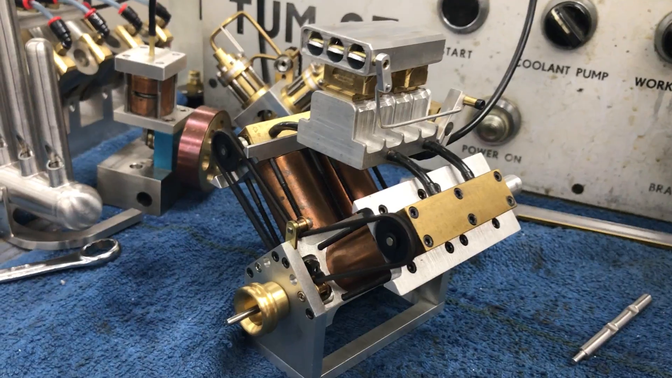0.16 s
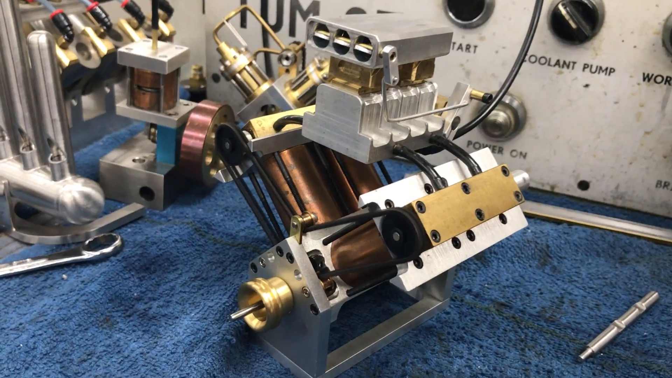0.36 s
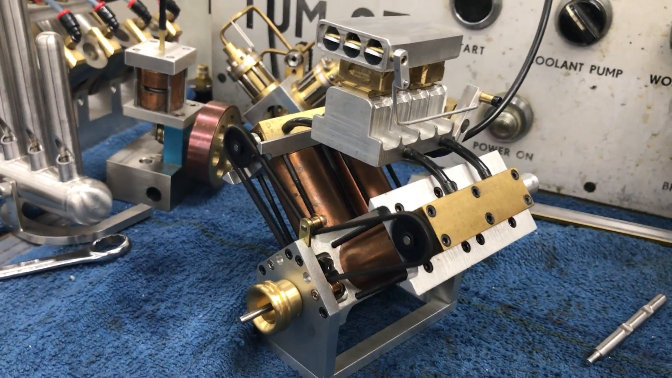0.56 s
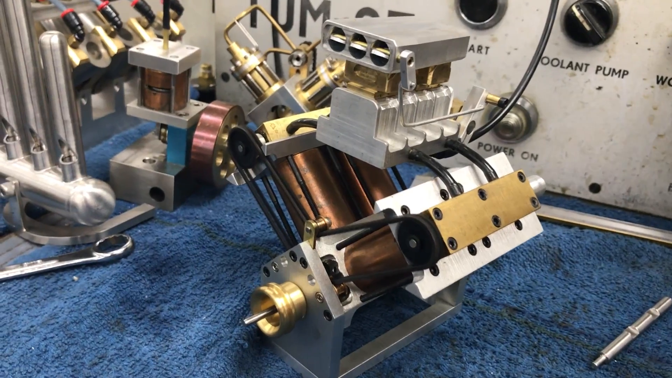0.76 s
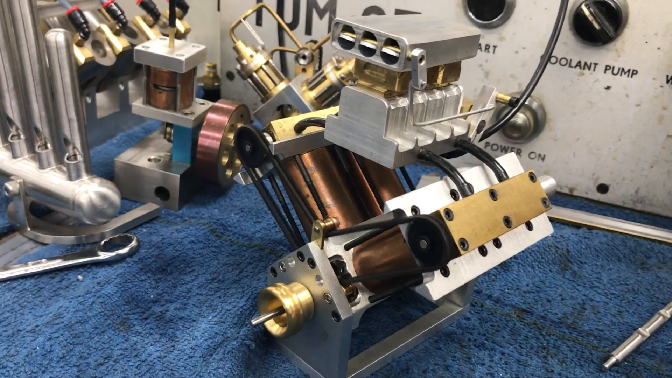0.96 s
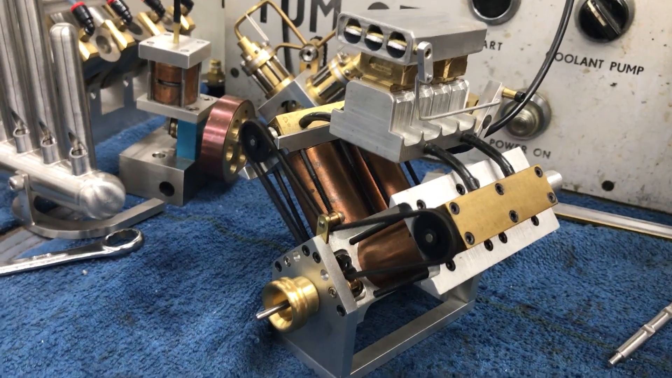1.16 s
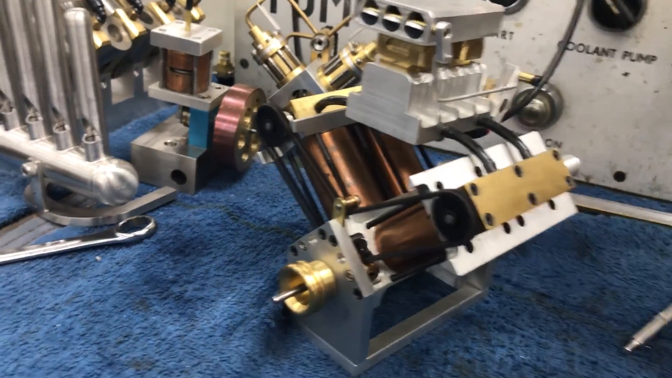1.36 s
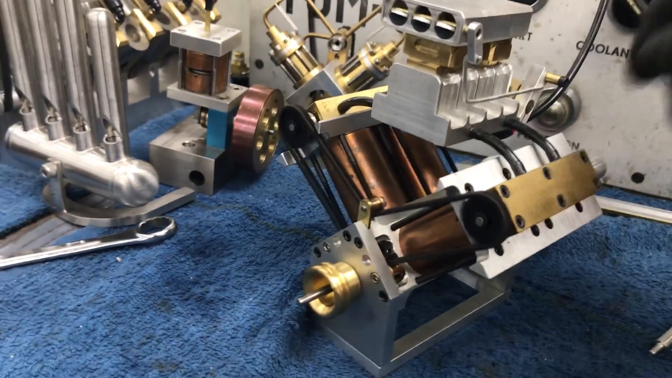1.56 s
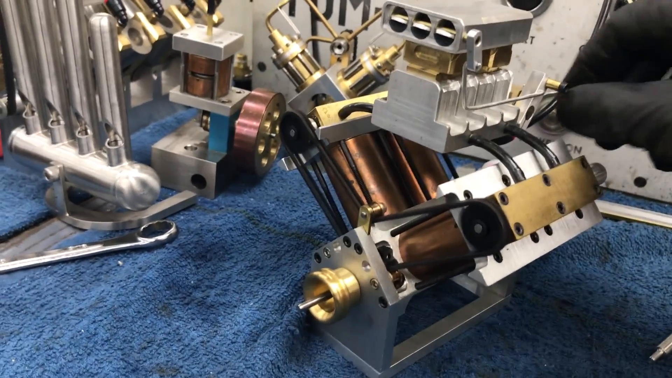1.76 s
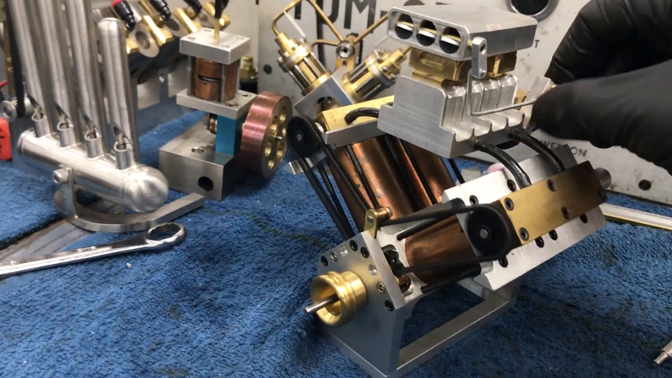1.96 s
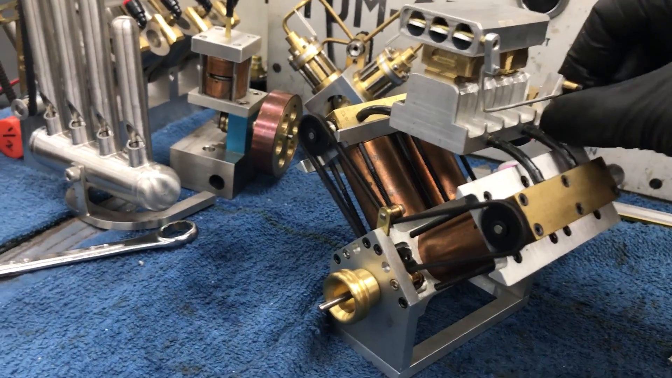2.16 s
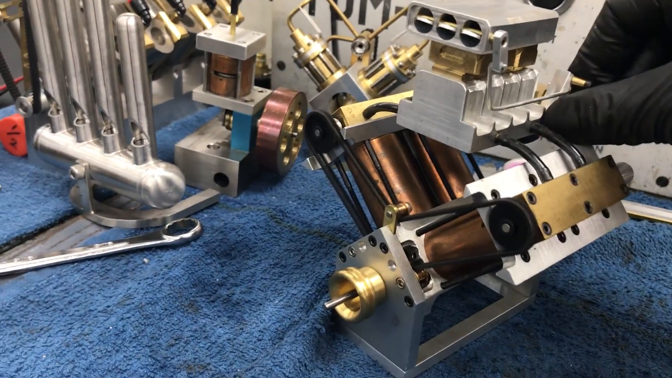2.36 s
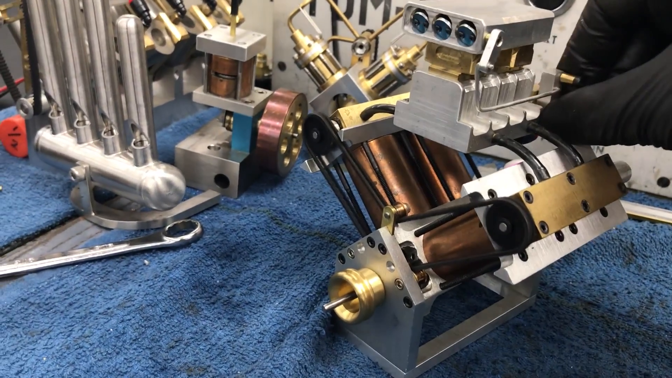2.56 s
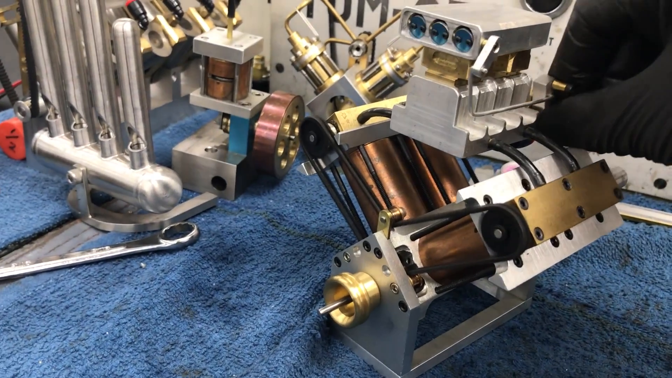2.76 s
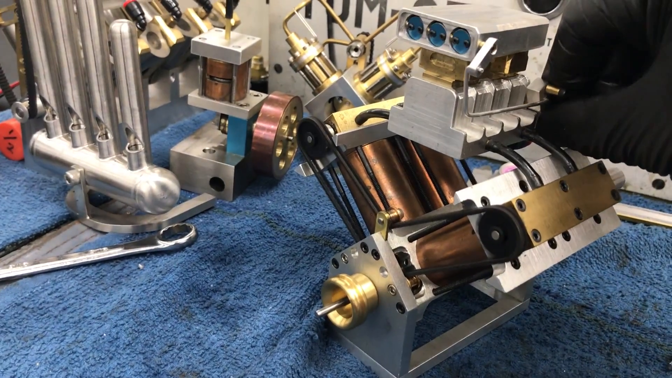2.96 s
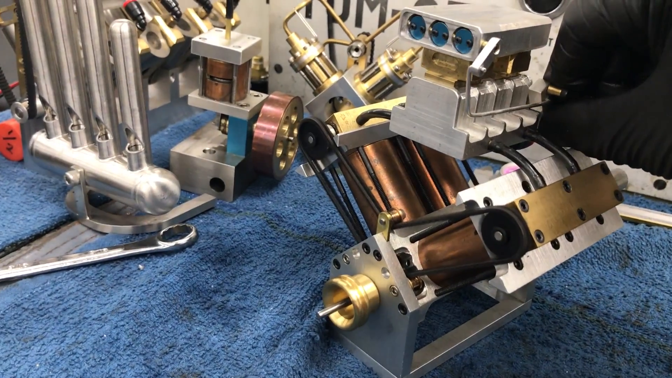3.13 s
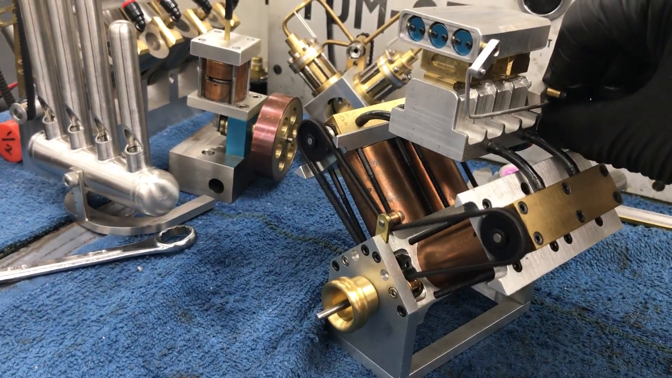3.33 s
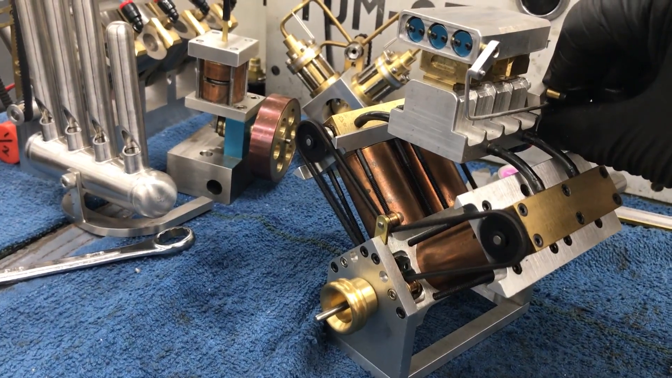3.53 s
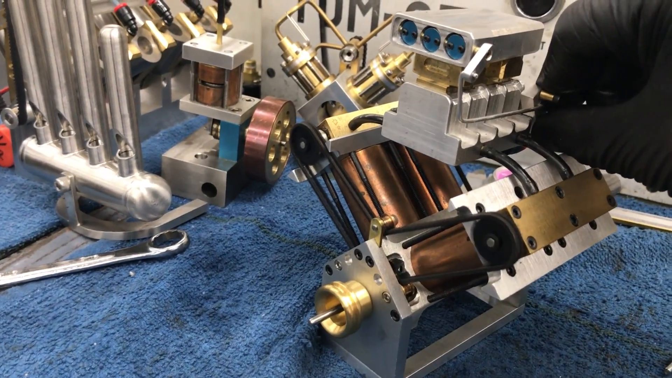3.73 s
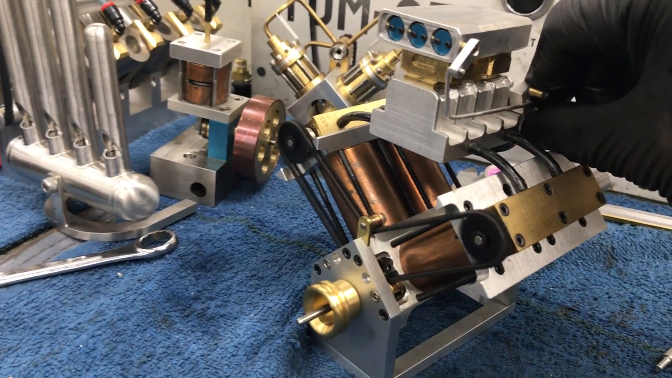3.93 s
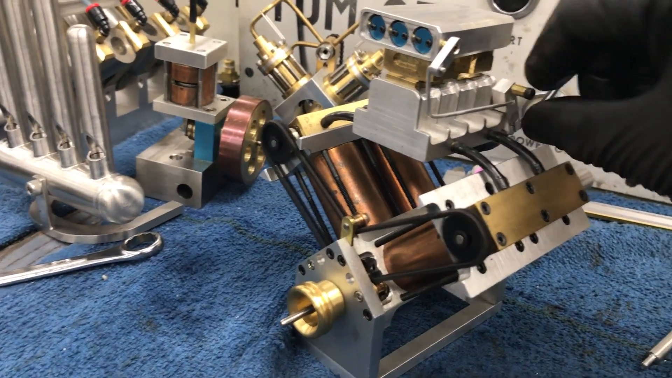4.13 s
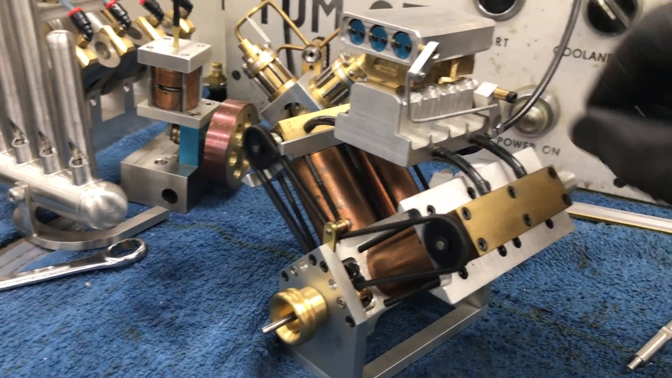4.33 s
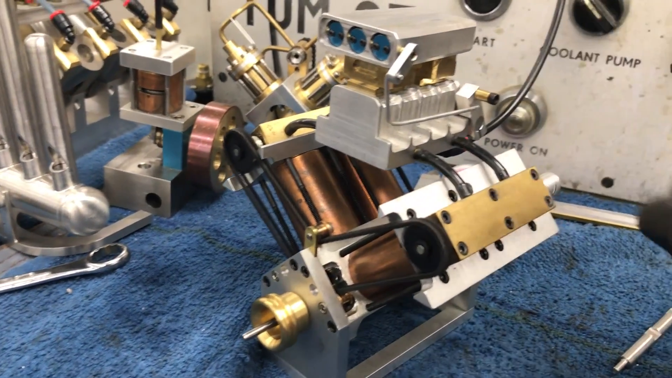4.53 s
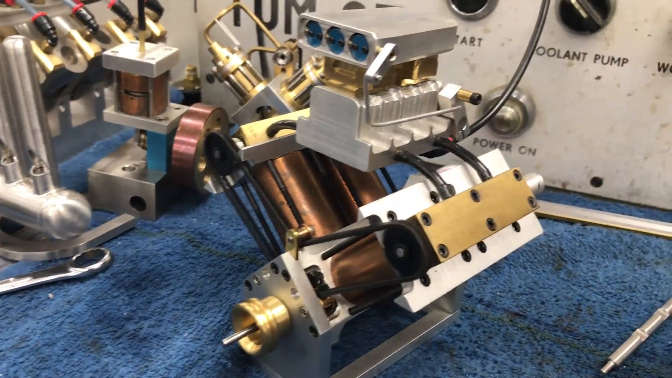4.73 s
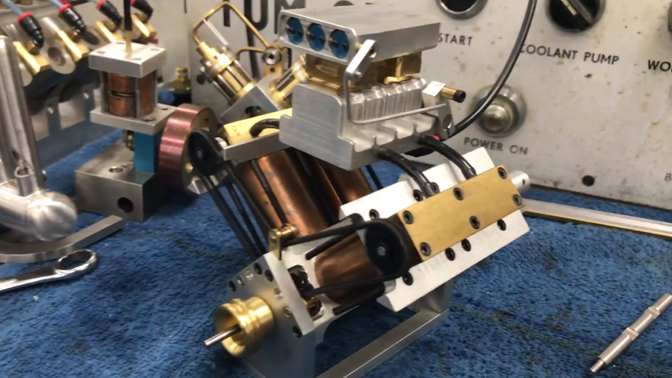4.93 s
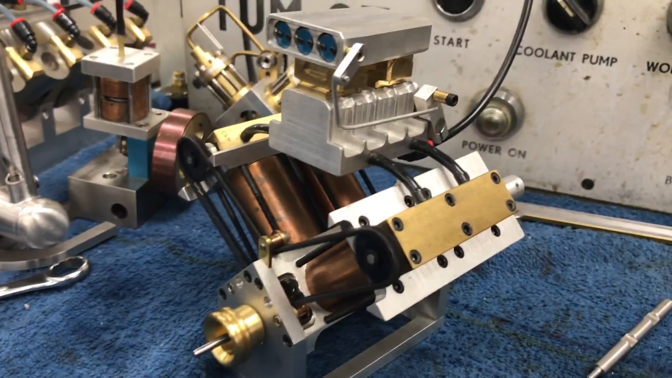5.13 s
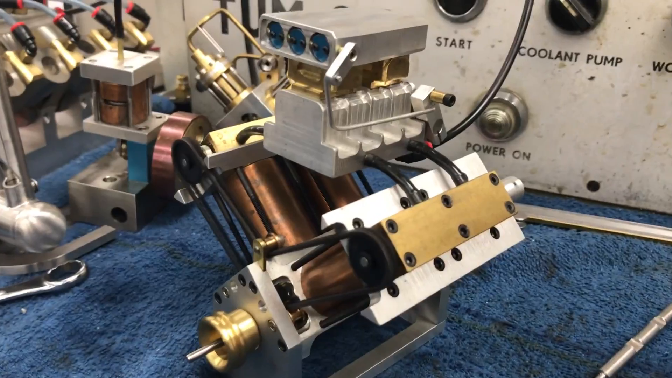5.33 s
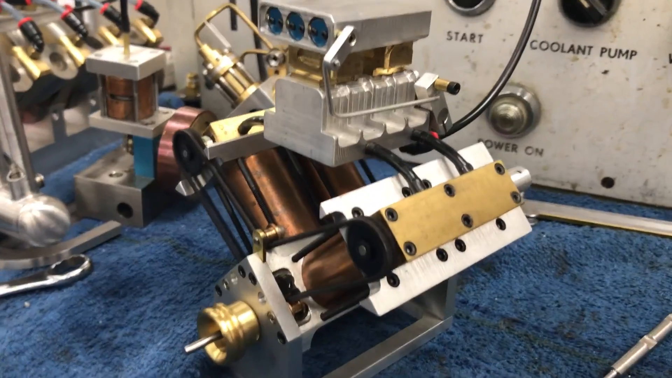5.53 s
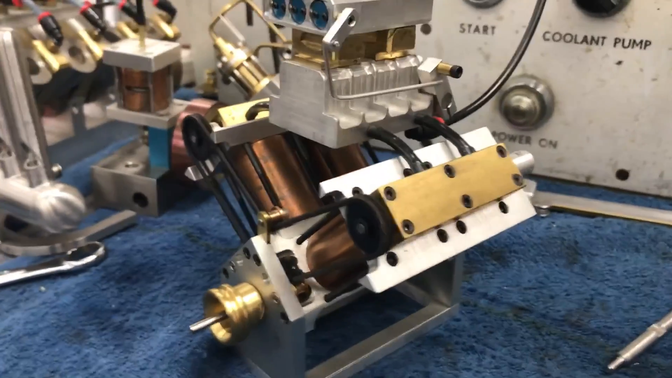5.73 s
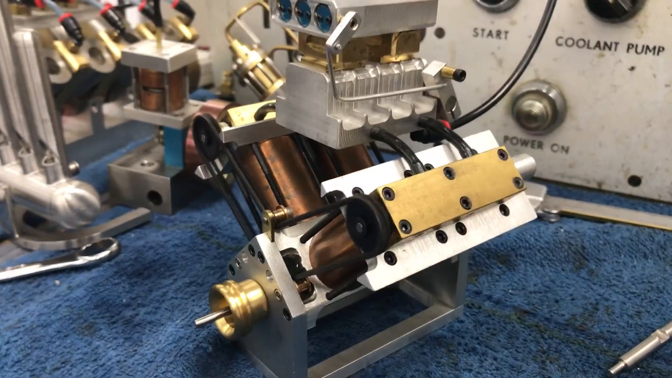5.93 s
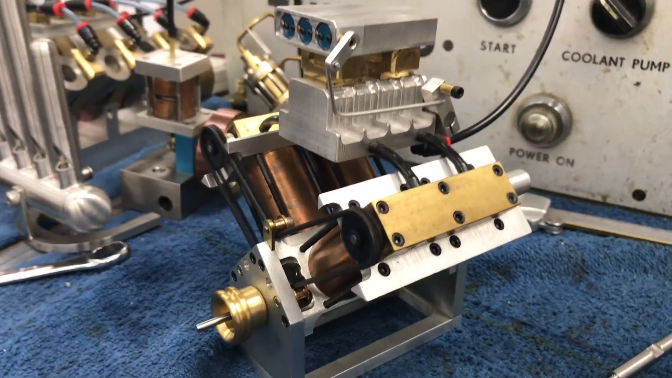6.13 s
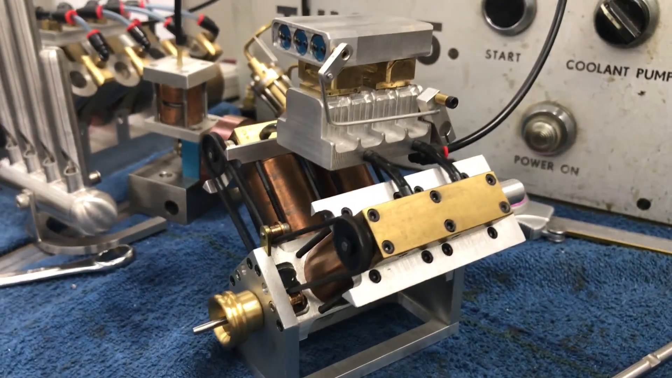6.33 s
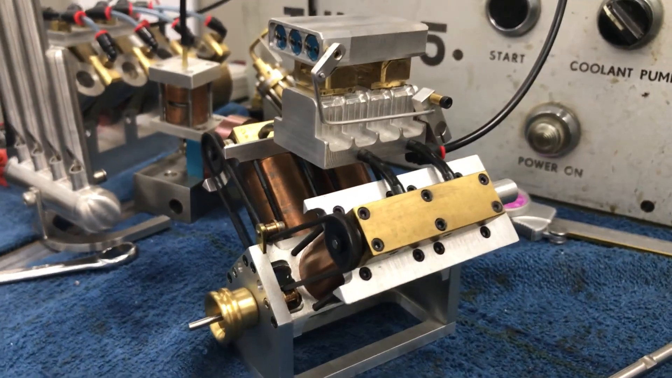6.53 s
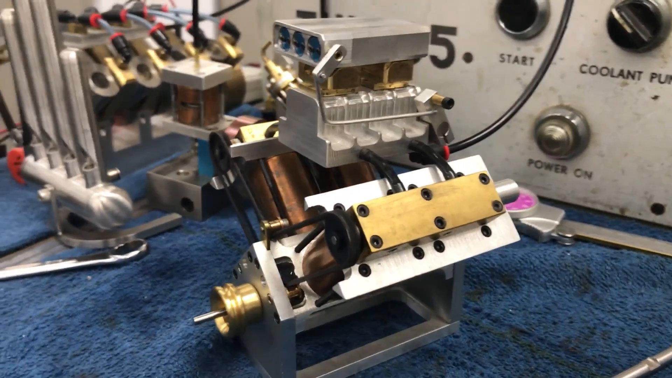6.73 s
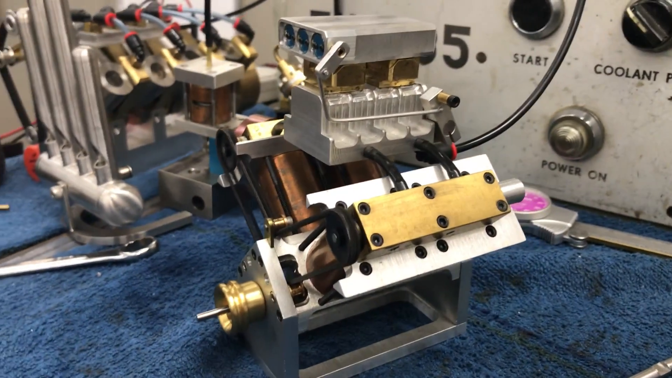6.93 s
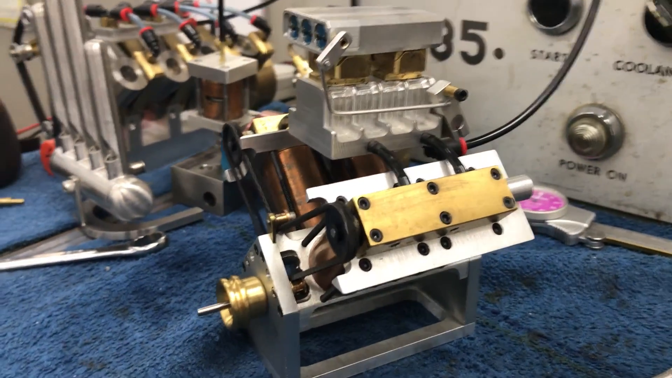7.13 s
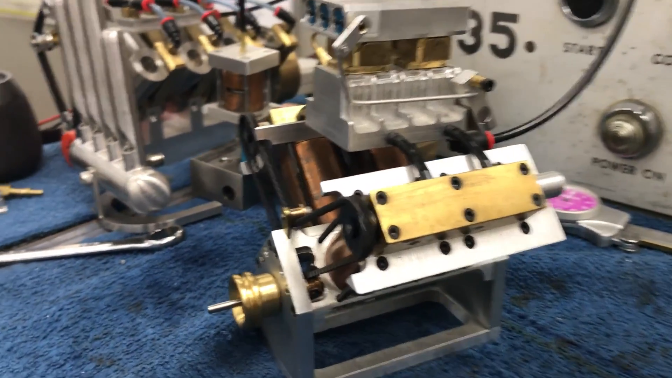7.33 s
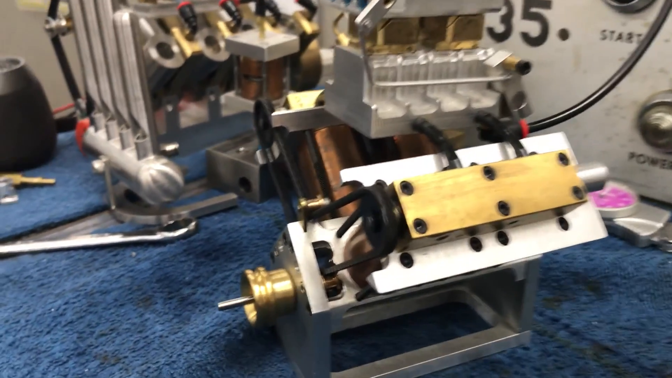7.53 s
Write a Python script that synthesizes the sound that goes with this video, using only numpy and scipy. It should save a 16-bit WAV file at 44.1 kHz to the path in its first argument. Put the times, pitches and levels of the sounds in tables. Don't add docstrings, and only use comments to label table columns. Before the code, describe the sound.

Close, dry workshop sound: a miniature air-driven engine puffs rapidly, two uneven strokes per turn, each thumping the microphone with a short ragged crack and a bright jet of air. After almost three seconds it weakens and slows to about five turns a second, a soft ticking hiss with no thumps, continuing to the end over faint machinery hum.

```python
import sys
import numpy as np
from scipy import signal
from scipy.fft import rfft, irfft, next_fast_len
from scipy.io import wavfile
from scipy.ndimage import uniform_filter1d, map_coordinates

SR = 44100
rng = np.random.default_rng(int(sys.argv[2]) if len(sys.argv) > 2 else 0)


def boost(x):
    u = np.asarray(x, float) / 20
    return 10 ** u


def generate_wav(sig):
    pcm = np.round(np.clip(np.atleast_2d(sig).T, -1, 1) * 32767).astype(np.int16)
    wavfile.write(sys.argv[1], SR, pcm)


N = 338688


def unit(x):
    return x / np.sqrt(np.mean(x ** 2) + 1e-20)


def wobble(rate):
    knots = rng.standard_normal(int(N * rate / SR) + 4)
    return map_coordinates(knots, [np.arange(N) * rate / SR])


def filtered(x, gain):
    m = next_fast_len(N + 8192)
    return irfft(rfft(x, m) * gain(np.fft.rfftfreq(m, 1 / SR) + 1), m)[:N]


def colour(points, hz):
    f, db = np.transpose(points)
    return boost(np.interp(np.log(hz), np.log(f), db))


def blend(a, b, share):
    return np.sqrt(1 - share) * a + np.sqrt(share) * b


def patchy(patchy_db):
    z = signal.stft(rng.standard_normal(N + 512), nperseg=256)[2]
    field = uniform_filter1d(rng.standard_normal(z.shape), size=2, axis=0)
    field = uniform_filter1d(field, size=10, axis=1)
    return signal.istft(z * boost(patchy_db * unit(field)), nperseg=256)[1][:N]


def turbulence(eddies, points, band=np.ones_like, patchy_db=2.5):
    return unit(filtered(eddies * patchy(patchy_db), lambda hz: colour(points, hz) * band(hz)))


# t/s, turns done
REVOLUTIONS = [(-.0242, 0), (.487, 5), (2.5435, 25), (2.6499, 26), (2.7565, 27), (2.87, 28), (2.9977, 29),
               (3.175, 30), (3.3802, 31), (3.7945, 33), (4.214, 35), (4.839, 38), (5.472, 41), (6.321, 45),
               (6.948, 48), (7.79, 52)]
# turn time/s, share of the turn gone at the long stroke
LONG_STROKE_LAG = [(.103, .386), (.113, .402), (.177, .395), (.205, .44)]


def strokes():
    s, turns = np.transpose(REVOLUTIONS)
    short = np.interp(np.arange(turns[-1] + 1), turns, s)
    turn_s = np.diff(short)
    long = short[:-1] + turn_s * np.interp(turn_s, *np.transpose(LONG_STROKE_LAG))
    return np.c_[long, short[1:]].ravel(), short


# t/s, t/s
TURN_TIME = (0.121, 0.134)


def crank():
    long_stroke_turns = 0.4
    s, short = strokes()
    index = np.arange(len(s))
    turns = (index + 1) // 2 + long_stroke_turns * (index % 2 == 0)
    t = np.arange(N) / SR
    full_s, throttled_s = TURN_TIME
    slow = np.clip((np.diff(short) - full_s) / (throttled_s - full_s), 0, 1)
    return np.interp(t, np.r_[short[0], s], np.r_[0, turns]), np.interp(t, short[1:], slow)


# crank angle/turns, rise/turns, fall/turns, level/dB
VALVE_SPITS = [
    [(.0, 0.033, 0.025, 0.04), (0.11, 0.034, 0.037, -10), (.395, 0.031, .04, -2), (0.468, 0.016, 0.051, -13), (0.587, 0.033, .03, -18)],
    [(1, 0.031, 0.023, -0.83), (0.406, 0.042, 0.052, -12.5)],
]
# crank angle/turns, rise/turns, fall/turns, level/dB
PORT_GUSHES = [
    [(1, 0.074, 0.09, 1.5), (0.14, 0.027, 0.075, 0.5), (0.4, 0.057, 0.26, 3), (0.62, .04, 0.11, -2)],
    [(.11, 0.025, 0.065, 0.5), (.19, 0.06, 0.036, -1), (.395, 0.042, 0.062, 4.5), (.52, 0.073, 0.11, .1), (.62, .06, 0.067, 1.5), (.8, 0.16, 0.19, -4.5), (.96, .05, .02, -0.3)],
]
# low level/dB, body level/dB, jet level/dB, whistle level/dB
SPIT_VOICE = [
    (-16.5, -22, -17.5, -29),
    (-47, -24.5, -15.5, -23),
]
GUSH_VOICE = [
    (-44, -32.5, -23, -16),
    (-49, -40.5, -29.5, -26),
]
SEEP_VOICE = [
    (-61.5, -33.5, -26.5, -26.5),
    (-52.5, -45.5, -38, -43.5),
]


def opening(turns, bite_db, index, snap=1):
    def reach(at, rise, fall):
        away = (turns - at + .5) % 1 - .5
        return np.abs(away / np.where(away < 0, rise, fall))

    spit = sum(boost(2 * db) * np.exp(-2 * (snap * reach(*place)) ** 2)
               for *place, db in VALVE_SPITS[index])
    short_spit = VALVE_SPITS[index][0][:-1]
    spit = spit * boost(2 * bite_db * np.exp(-reach(*short_spit) ** 2 / 2))
    gush = sum(boost(2 * db) * np.exp(-2 * reach(*place)) for *place, db in PORT_GUSHES[index])
    voices = zip(SEEP_VOICE[index], SPIT_VOICE[index], GUSH_VOICE[index])
    return [10 * np.log10(boost(2 * seep_db) + boost(2 * spit_db) * spit + boost(2 * gush_db) * gush)
            for seep_db, spit_db, gush_db in voices]


# long stroke level/dB, short stroke level/dB
BLAST_LEVELS = [(-16, -15.5), (-15, -19), (-17.5, -18), (-18, -13.5), (-18, -15), (-16.5, -14.5),
                (-14.5, -14), (-12.5, -16), (-16, -16.5), (-12.5, -18.5), (-17.5, -19), (-13.5, -18),
                (-16, -18.5), (-17, -17.5), (-14, -15.5), (-15.5, -19), (-16, -18.5), (-16.5, -19),
                (-16, -12.5), (-15, -16), (-14, -18), (-17.5, -14), (-16, -13), (-16.5, -14.5), (-15, -20),
                (-12.5, -18.5), (-17.5, -23.5), (-26, -21.5), (-38, -45.5)]
# f/Hz, level/dB
CRACK_SPECTRUM = [(120, -18), (200, 0), (480, -5.5), (940, -2), (1700, -6), (2500, -8), (3500, -10.5),
                  (5500, -23), (9000, -80)]


def cracks(eddies, low_db):
    t = np.arange(N) / SR
    s = strokes()[0][:np.size(BLAST_LEVELS) + 1]
    blast_db = np.interp(t, s, [*np.ravel(BLAST_LEVELS), -80])
    level_db = low_db + blast_db + 17.5 + 1.7 * wobble(350)
    return boost(level_db) * turbulence(eddies, CRACK_SPECTRUM, patchy_db=0.6)


# f/Hz, level/dB
LEAK_SPECTRUM = [(200, -7), (400, -9), (700, 4), (1200, 23), (2000, -7), (2800, -28), (3600, -22),
                 (6000, -120)]
# f/Hz, level/dB
MURMUR_SPECTRUM = [(150, -28), (250, -12), (353, -8.5), (386, -2.5), (454, -12.5), (473, -10), (1090, -1.5),
                   (1610, -7), (2240, -6.5), (2800, -4), (3640, -29), (6160, -120)]


def leakage(eddies, slow, idle_low_db):
    leak = turbulence(eddies, LEAK_SPECTRUM)
    murmur = turbulence(eddies, MURMUR_SPECTRUM)
    level_db = (1 - slow) * -48 + slow * idle_low_db + 0.77 * wobble(30)
    return boost(level_db) * blend(leak, murmur, slow)


# f/Hz, level/dB
FULL_HISS = [(1600, -16), (2900, -15.5), (3500, -10.5), (4400, -8), (5100, -10.5), (6400, -4.5),
             (8300, -4.5), (9200, -3), (10300, -5), (11400, -2), (12900, -4), (14200, -4.5), (15700, -9.5),
             (17100, -8.5)]
# f/Hz, level/dB
THROTTLED_HISS = [(2200, -26), (3000, -12), (3500, -7.5), (4400, -4), (5100, -7), (6400, 0), (8300, -5.5),
                  (9200, -1.5), (10300, -4), (11400, -3), (12900, -1), (14200, -2.5), (15700, -7),
                  (17100, -4)]
# f/Hz, level/dB
SIDE_HISS = [(2200, -33), (3000, -12.5), (3500, -9.5), (4400, -7.5), (5100, -12), (6400, 0), (8300, -8),
             (9200, -6.5), (10300, -7.5), (11400, -7.5), (12900, -4.5), (14200, -4), (15700, -12.5),
             (17100, -10.5)]
# start t/s, end t/s
MICROPHONE_MOVE = (4.44, 6.33)
# low edge f/Hz, high edge f/Hz
HISS_BANDS = [
    (1500, 5390),
    (5100, 10040),
    (10300, 19500),
]
# trim level/dB, share of the whistle lead
HISS_BALANCE = [
    (.5, 0.15),
    (0.23, -0.36),
    (.1, 0.64),
]


def hiss(eddies, slow, fast, idle, flow_db, lead_db):
    t = np.arange(N) / SR
    start_s, end_s = MICROPHONE_MOVE
    moved = np.clip((t - start_s) / (end_s - start_s), 0, 1)
    out = np.zeros(N)
    for k, ((lo_hz, hi_hz), (trim_db, share)) in enumerate(zip(HISS_BANDS, HISS_BALANCE), start=1):
        def band(hz):
            return 1 / np.sqrt((1 + (lo_hz / hz) ** 24) * (1 + (hz / hi_hz) ** 24))

        full = turbulence(eddies, FULL_HISS, band)
        front = turbulence(eddies, THROTTLED_HISS, band)
        side = turbulence(eddies, SIDE_HISS, band)
        opening_db = (1 - slow) * fast[k] + slow * idle[k]
        level_db = opening_db + flow_db + trim_db + share * lead_db + 0.77 * wobble(30)
        out += boost(level_db) * blend(full, blend(front, side, moved), slow)
    return out


# t/s, flow level/dB, extra bite of the short spit level/dB, whistle over jet level/dB
AIR_SUPPLY = [(0, 0.5, 1, 1), (1.3, 0, .5, 1.2), (2.5, -0.1, -0.5, 1), (2.8, -2, 2.5, 1), (2.92, -2, 0, -2),
              (3.07, -2.2, 5, 1), (3.2, -0.6, -3.5, 2), (3.45, -0.5, .5, 2.5), (4, -0.5, 1.5, 1.7),
              (4.4, -0.3, -1.5, 2), (4.9, 0.1, 1, 1.8), (5.8, 0.6, -1, 0.5), (6.7, 0.3, 0.7, 0.5),
              (7.2, 1, 0.5, -1), (7.68, 2, -0.3, -3)]


def ports():
    stroke_scatter_db = 0.24
    snap_share = 0.7
    t = np.arange(N) / SR
    turns, slow = crank()
    s = strokes()[0]
    falling = np.interp(t, [2.55, 2.87], [0, .15])
    supply_s, *supply = np.transpose(AIR_SUPPLY)
    flow_db, bite_db, lead_db = (np.interp(t, supply_s, column) for column in supply)
    flow_db = flow_db + np.interp(t, s, stroke_scatter_db * rng.standard_normal(len(s)))
    eddies = boost(1.0 * wobble(900) - 0.13 * wobble(70))
    snap = 1 + snap_share * np.sqrt(slow + falling)
    fast = opening(turns, bite_db, index=0, snap=snap)
    idle = opening(turns, bite_db, index=1)
    out = cracks(eddies, fast[0]) + leakage(eddies, slow, idle[0])
    return out + hiss(eddies, slow, fast, idle, flow_db, lead_db)


# start/ms, pitch, fall, phase/rad, decay/ms
THUMP_RING = [
    (-2.4, .83, .526, -2.7, 8.5),
    (-1.4, .83, .542, -2.3, 5.9),
]
# t/s, level/dB
EXHAUST_AIM = [(0, 0.5), (.65, 2.5), (1.2, 1.5), (1.7, -2.5), (2.3, 1.5), (2.9, -3)]


def thumps():
    thump_db = (-28.5, -22)
    grows, scatter_db, usual_blast_db = 0.85, 1.5, -15
    out = np.zeros(N + SR)
    ms = np.arange(SR // 12) / SR * 1000
    chance = rng.standard_normal((np.size(BLAST_LEVELS), 4))
    events = zip(strokes()[0], np.ravel(BLAST_LEVELS), chance)
    for k, (s, blast_db, (late, bend, damp, luck)) in enumerate(events):
        start_ms, pitch, fall, phase, decay_ms = THUMP_RING[k % 2]
        db = thump_db[k % 2] + grows * (blast_db - usual_blast_db)
        db += np.interp(s, *np.transpose(EXHAUST_AIM)) + scatter_db * luck
        life = ms / (.92 * decay_ms * (1 + .12 * damp))
        swing = np.sin(np.pi * pitch * (1 + 0.04 * bend) * ms ** fall + phase)
        first = round((s + (start_ms + .4 * late) / 1000) * SR)
        out[first:][:len(ms)] += boost(db + 5.5) * swing * life * np.exp(1 - life)
    return filtered(out[:N], lambda hz: 1 / np.sqrt(1 + (43 / hz) ** 8))


def hum(shaft_hz, orders):
    turn = 2 * np.pi * shaft_hz * np.arange(N) / SR
    out = np.zeros(N)
    for order, db in orders:
        level = np.sqrt(2) * boost(db + 1.1 * wobble(2.48))
        out += level * np.sin(order * turn + rng.uniform(0, 2 * np.pi))
    return out


# f/Hz, level/dB
RUMBLE_SPECTRUM = [(15, -50), (25, -30), (38, -20), (54, -6.5), (124, -2), (152, -9), (200, -13.5),
                   (320, -21.5), (420, -47), (700, -120)]
# order, level/dB
PUMP_ORDERS = [(3, -67), (5, -58), (6, -56.5), (7, -61), (9, -53), (10, -58), (11, -59), (13, -62),
               (14, -63), (15, -65), (16, -69), (18, -68), (20, -68), (21, -68)]
MOTOR_ORDERS = [(1, -52), (2, -59), (3, -73), (4, -77)]
FAN_ORDERS = [(1, -68), (4, -67), (5, -73), (6, -69), (7, -75), (8, -68), (9, -72)]
MAINS_ORDERS = [(1, -57), (2, -67), (3, -71), (4, -72)]


def shop():
    noise = filtered(rng.standard_normal(N), lambda hz: colour(RUMBLE_SPECTRUM, hz))
    rumble = boost(-48) * unit(boost(.7 * wobble(6)) * noise)
    pump_hz, motor_hz, fan_hz, mains_hz = 10.195, 58.5, 47.76, 120
    machines = hum(pump_hz, PUMP_ORDERS) + hum(motor_hz, MOTOR_ORDERS)
    return rumble + machines + hum(fan_hz, FAN_ORDERS) + hum(mains_hz, MAINS_ORDERS)


def scene():
    return (ports() + thumps() + shop())[None]


def band_limit(x):
    return signal.sosfilt(signal.butter(12, 17950, fs=SR, output="sos"), x)


# f/Hz, level/dB
MICROPHONE_PORT = [(4600, 1), (4950, -2.5), (5600, -0.5), (10000, 0.5), (10400, -1.5), (10900, 2),
                   (12000, 0.5), (12400, -3.5), (13000, -0.5), (15400, .1), (15800, -4), (16300, -.5)]


def record(dry):
    x = filtered(dry[0], lambda hz: colour(MICROPHONE_PORT, hz))
    x = x / (1 + np.abs(x / 1.05) ** 6) ** (1 / 6)
    top_hz = 17200
    mix = filtered(x, lambda hz: hz < top_hz)[None]
    return band_limit(mix)


dry = scene()
out = record(dry)
generate_wav(out)
```